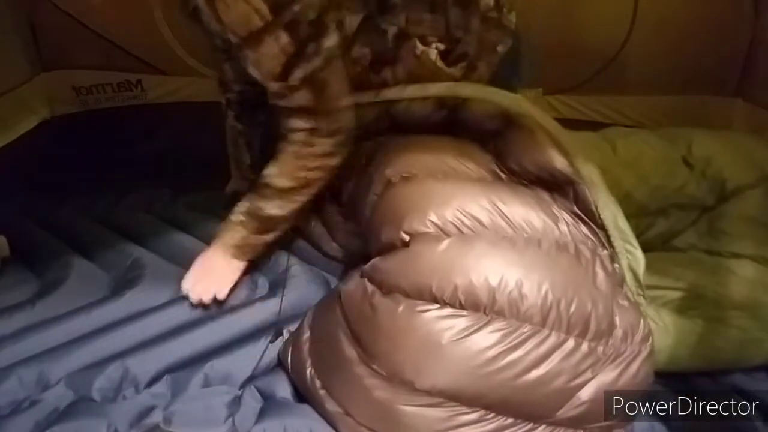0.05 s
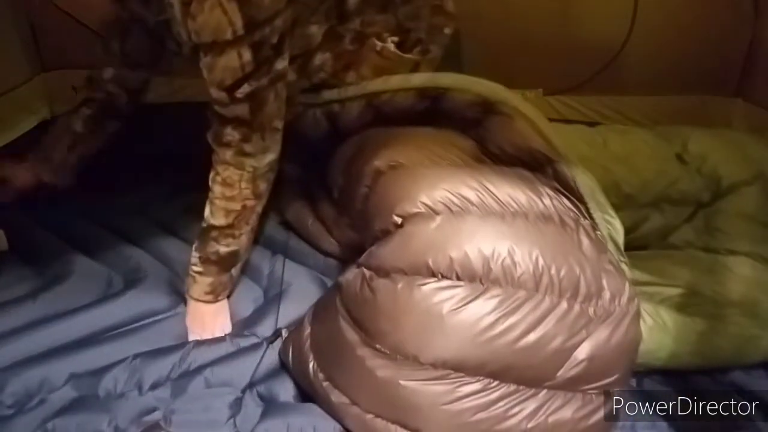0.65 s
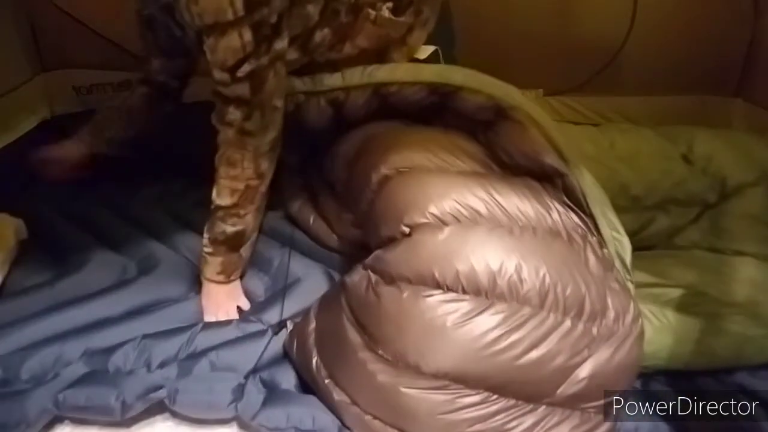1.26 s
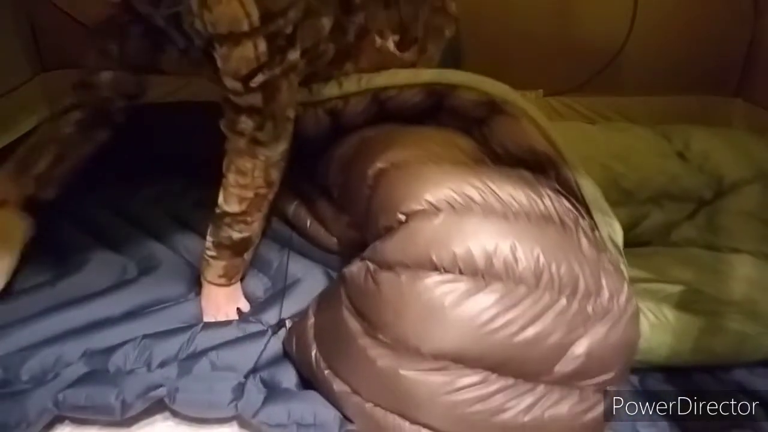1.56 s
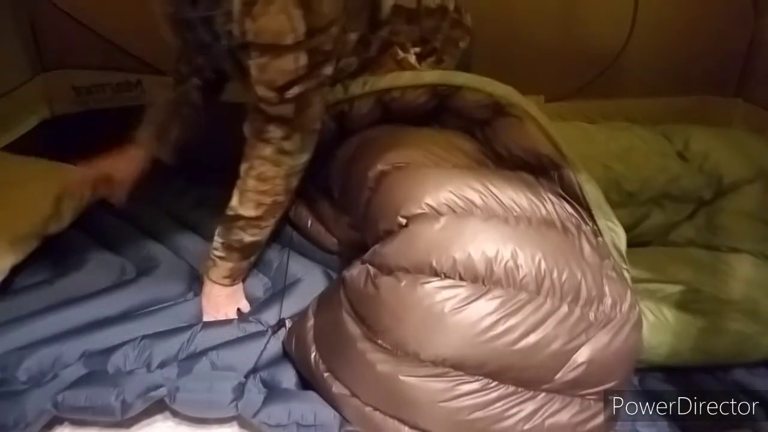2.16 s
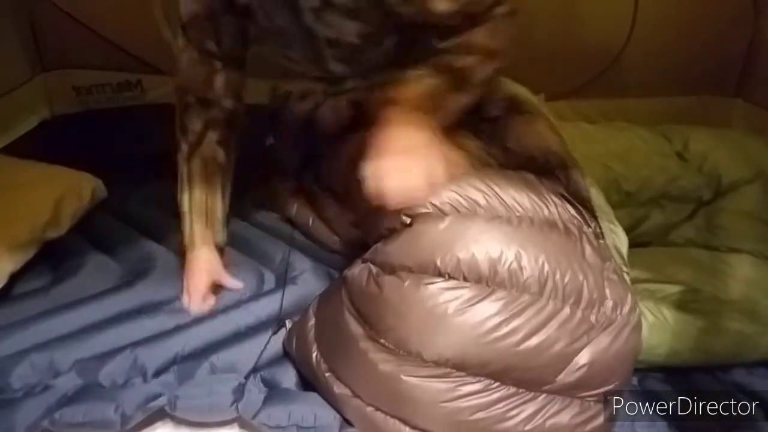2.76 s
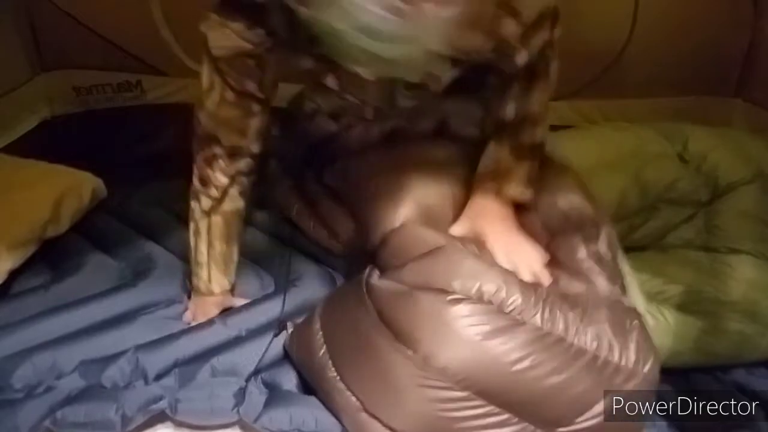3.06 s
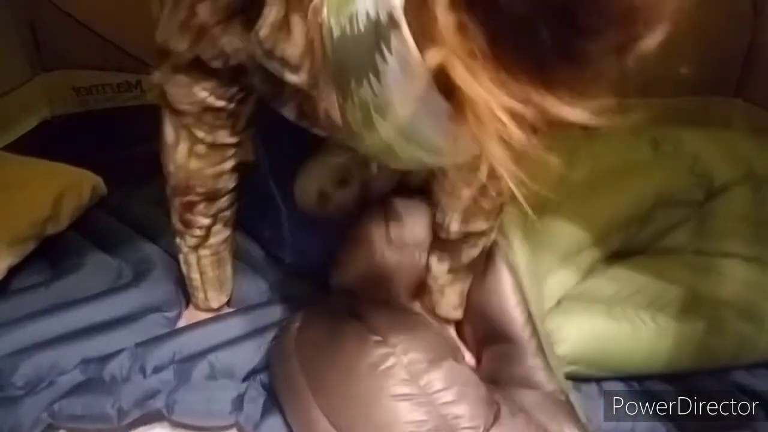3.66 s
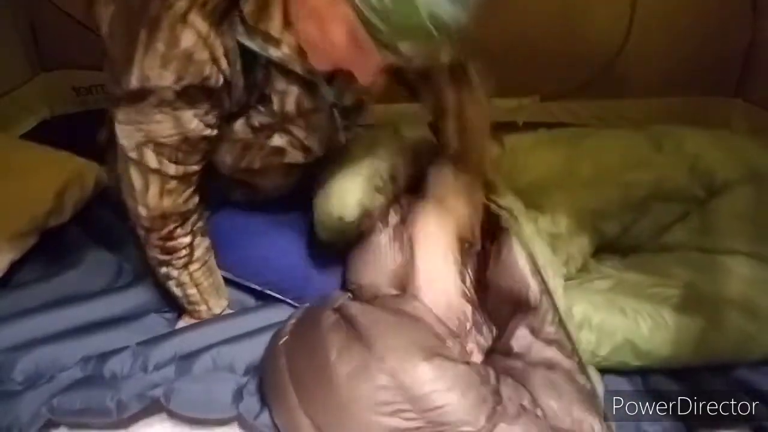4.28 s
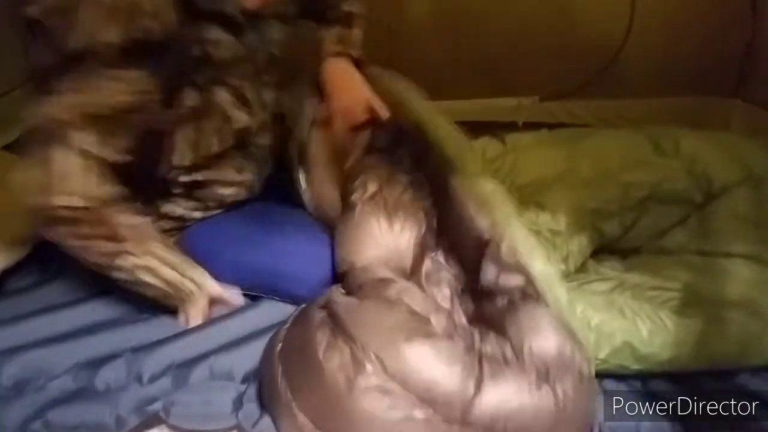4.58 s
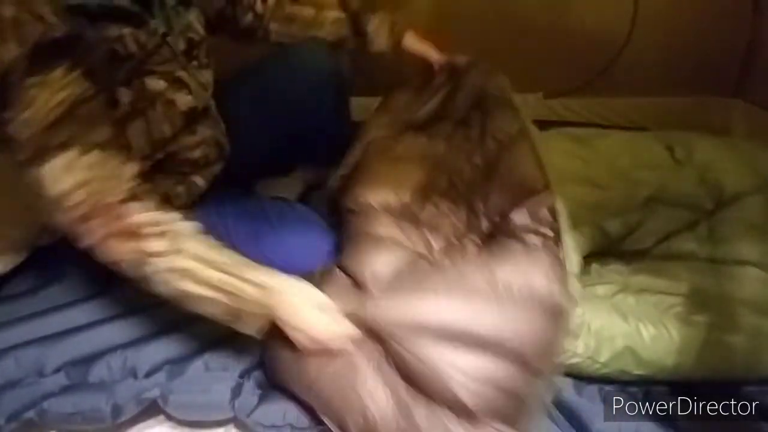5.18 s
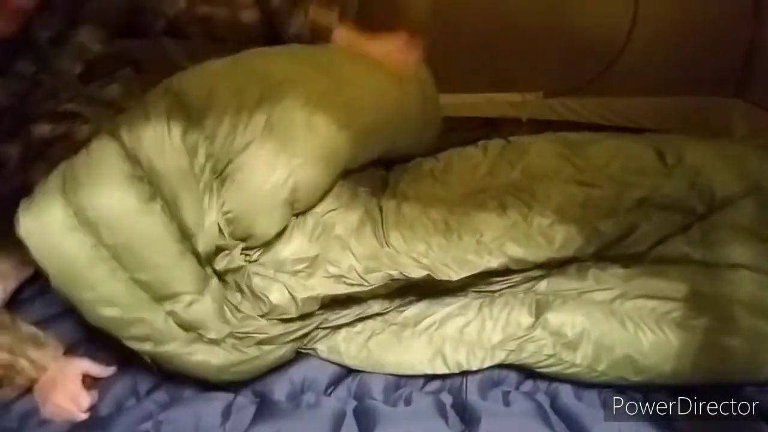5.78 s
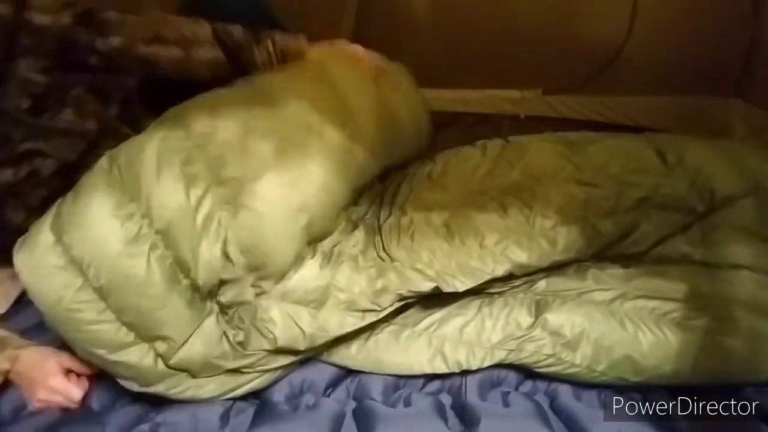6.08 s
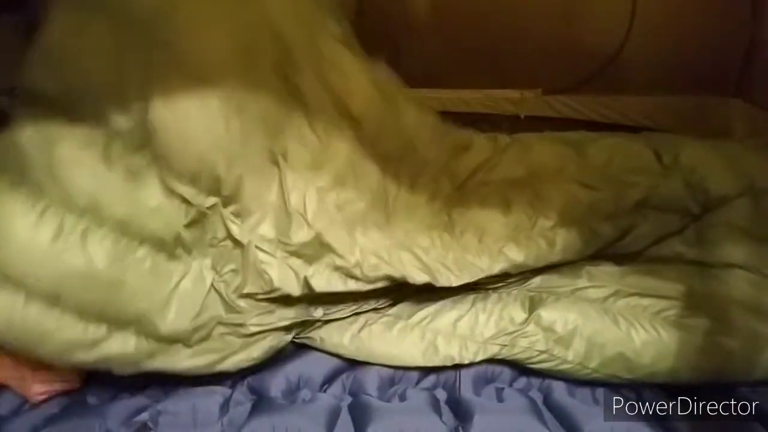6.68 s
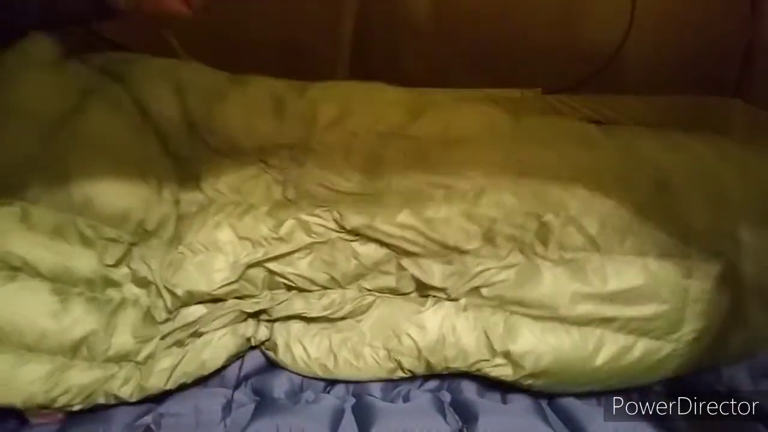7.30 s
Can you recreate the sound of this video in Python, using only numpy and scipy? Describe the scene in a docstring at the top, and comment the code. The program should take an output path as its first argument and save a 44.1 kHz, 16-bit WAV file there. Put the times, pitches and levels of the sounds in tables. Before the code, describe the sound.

Close, uneven rustling and sliding of down-filled nylon bedding, broken midway by a single hollow air pad thump.

```python
"""In a tent, someone crawls onto an air pad, pushes a down quilt aside and pulls another over, close by.
Thin nylon hisses as it slides, its wrinkles buckle in swarms and single snaps, and the down fill
shuffles softly. Hands and knees thump the pad, once hard enough to set its air chambers ringing.
The cloth walls give a weak echo, and a faint steady noise lies under it all."""
import sys
import numpy as np
from scipy import signal
from scipy.fft import rfft, irfft
from scipy.io import wavfile
from scipy.ndimage import uniform_filter1d

SR = 44100
rng = np.random.default_rng(int(sys.argv[2]) if len(sys.argv) > 2 else 0)


def bounce(signal):
    """Save signal as a 16-bit WAV file at the path given by the first command-line argument."""
    frames = np.transpose(np.atleast_2d(signal))
    limited = np.clip(frames, -1, 1)
    pcm = np.round(limited * 32767).astype(np.int16)
    wavfile.write(sys.argv[1], SR, pcm)


N = 323694
LAG_S = 0.0001244  # the bedding is nearer the right side, so the left hears it later

# tone of small buckling wrinkles: f/Hz, level/dB
CRUMPLE_TONE = [(40, 14), (300, -3), (700, -3.5), (1100, 1.5), (1900, -0.5), (2300, -1), (2700, -2),
                (3500, -4), (5000, -7.5), (8000, -6.5), (10000, -27), (16000, -8)]


def gain_of(db):
    """Turns decibels into a number to multiply a sound by."""
    return 10 ** (np.asarray(db) / 20)


def evened(x):
    """Scales a signal to an average size (rms) of 1."""
    return x / np.sqrt(np.mean(x ** 2) + 1e-20)


def peaked(x):
    """Scales a sound so that its outline peaks at 1."""
    return x / abs(signal.hilbert(x)).max()


def look_up(points, hz):
    """Reads between the rows of a table, on a log frequency scale."""
    f, value = np.transpose(points)
    return np.interp(np.log(hz + 1), np.log(f + 1), value)


def add(mix, s, sound):
    """Mixes a sound in, starting at s seconds."""
    part = mix[max(round(s * SR), 0):][:len(sound)]
    part += sound[:len(part)]


def coloured(x, tone, size=4096):
    """Gives a sound the tone in a table, with a filter that keeps sudden starts sharp."""
    log_gain = np.log(gain_of(look_up(tone, abs(np.fft.fftfreq(size, 1 / SR)))))
    taps = np.fft.ifft(np.exp(np.conj(signal.hilbert(log_gain)))).real[:size // 2]
    return signal.oaconvolve(x, taps.reshape((1,) * (x.ndim - 1) + (-1,)))[..., :x.shape[-1]]


def stereo(x, lag_s):
    """Makes two channels, the left lag_s behind the right."""
    lag = int(round(lag_s * SR))
    return np.array([np.roll(x, lag // 2), np.roll(x, lag // 2 - lag)])


def wander(rate_hz):
    """A smooth random curve that moves mostly slower than rate_hz."""
    hz = np.fft.rfftfreq(N, 1 / SR)
    return evened(irfft(rfft(rng.standard_normal(N)) / (1 + (hz / rate_hz) ** 2), N))


def hiss(tone, patchy_db, size=512):
    """Stereo noise with louder patches that come and go across time and pitch."""
    # how alike left and right are: f/Hz, likeness (0 to 1)
    likeness = [(60, 0.98), (290, 0.74), (640, 0.35), (1400, 0.27), (3000, 0.28), (7000, 0.028),
                (15000, 0.082)]
    frames, hz = N // (size // 4) + 5, np.fft.rfftfreq(size, 1 / SR)
    a, b, c, d, patches = rng.standard_normal((5, frames, len(hz))).transpose(0, 2, 1)
    patches = evened(uniform_filter1d(uniform_filter1d(patches, size=11, axis=0), size=12, axis=1))
    same = np.clip(look_up(likeness, hz), 0, 1)[:, None]
    right, unrelated = a + 1j * b, c + 1j * d
    delay = np.exp(-2j * np.pi * hz * LAG_S)[:, None]
    left = (same * right + np.sqrt(1 - same ** 2) * unrelated) * delay
    spectra = np.array([left, right]) * gain_of(patchy_db * patches)
    noise = signal.istft(spectra, nperseg=size, noverlap=size - size // 4)[1][:, :N]
    return evened(coloured(noise, tone))


def background(level_db=-56.5):
    """A faint, steady, low rush."""
    # tone of the rush: f/Hz, level/dB
    rush_tone = [(20, -12), (40, -10), (70, 4.5), (130, -1), (230, 3), (350, -12), (600, -9.5), (1200, -21),
                 (3000, -24.5), (9500, -28), (15000, -24)]
    return gain_of(level_db) * hiss(rush_tone, patchy_db=1.5)


def tent_echo(x, size=8192):
    """Sound bounces off the cloth walls and dies quickly."""
    # how long the echo lasts: f/Hz, time to fade by 60 dB/s
    fade_times = [(100, 0.13), (400, 0.043), (1500, 0.21), (5000, 0.096), (15000, 0.011)]
    bounces = rng.standard_normal((2, size)) * (rng.random((2, size)) < .1)
    bounces *= np.arange(size) > SR * .002  # none in the first 2 ms
    hz, t, spectra = signal.stft(bounces, SR, nperseg=128)
    fade = gain_of(-60 * t / look_up(fade_times, hz)[:, None])
    tail = signal.istft(spectra * fade, SR, nperseg=128)[1]
    return signal.oaconvolve(x, tail / np.linalg.norm(tail, axis=1, keepdims=True), axes=1)[:, :N]


def pad_thumps(level_db=-2, ring_db=1, pulse_speed=0.89, low_hz=48):
    """Each blow pushes one pulse of air out of the pad, whose chambers ring on."""
    # hands and knees landing: t/s, relative level/dB, rough pitch f/Hz
    blows = [(0.2985, -34, 130), (0.7686, -44, 110), (1.048, -33, 120), (1.216, -37.5, 135),
             (2.253, -32.5, 208), (2.3207, -41, 250), (2.5033, -33.5, 220), (4.1692, -3.5, 192),
             (4.6541, -45, 292), (5.002, -30.5, 158), (5.0856, -26, 198), (5.3847, -36, 180),
             (5.453, -33, 98), (7.1775, -28.5, 240), (7.22, -26, 200)]
    # ringing air chambers and two brief knocks of the skin: f/Hz, level/dB, time to fade by 60 dB/s
    pad_notes = [(108, -35, .25), (152, -23, .25), (188, -20, .27), (238, -23, .24), (295, -20.5, .26),
                 (371, -25, .22), (440, -16, .03), (660, -18, .035), (678, -36, .16)]
    out, lead_s = np.zeros(N), .02
    t = np.arange(SR // 2) / SR - lead_s
    age = np.maximum(t, 0)
    ring = sum(gain_of(db - 60 * age / fade_s) * np.sin(2 * np.pi * hz * age)
               for hz, db, fade_s in pad_notes)
    for s, db, hz in blows:
        phase = 2 * np.pi * hz * t * pulse_speed
        push = phase / (1 + phase ** 2 / 4) ** 3
        # trim the lowest bass so the push is a tight thump
        push = signal.sosfiltfilt(signal.butter(2, hz * .38, "high", fs=SR, output="sos"), push)
        add(out, s - lead_s, gain_of(db + level_db) * (push / push.max() + gain_of(ring_db) * ring))
    # deep bass is cut from the thumps
    return stereo(signal.sosfiltfilt(signal.butter(2, low_hz, "high", fs=SR, output="sos"), out), 0)


def movement(layer, drag_db):
    """Loudness of one layer over time: each stroke swells and fades on top of the steady dragging."""
    # pushes and pulls: peak t/s, rise/s, fall/s, then level/dB for slide, crumple and fill
    strokes = [(.02, .1, .1, -58.5, -70, -66), (.16, 0.044, .068, -48, -50, -47),
               (.275, 0.14, 0.13, -50.5, -46.5, -45.5), (.378, 0.052, .022, -48.5, -51, -53),
               (.442, 0.026, 0.12, -59, -54, -55.5), (.615, .06, 0.13, -57, -74, -65),
               (.78, 0.019, 0.37, -47, -49.5, -55), (1.002, 0.098, 0.17, -36.5, -39, -39),
               (1.18, 0.071, 0.077, -42, -49, -46.5), (1.215, 0.028, 0.083, -44, -41, -46),
               (1.343, .15, .13, -47.5, -69, -53.5), (1.495, 0.056, .17, -44.5, -48.5, -43.5),
               (1.67, .06, 0.093, -45.5, -74, -51), (1.782, 0.031, 0.094, -48.5, -64, -52),
               (1.93, .07, 0.053, -55, -54, -53.5), (2.034, 0.037, 0.18, -54, -78, -64),
               (2.222, 0.056, 0.16, -51, -49, -51.5), (2.478, 0.11, 0.097, -51.5, -44.5, -44),
               (2.773, 0.084, 0.32, -56, -58, -55), (2.915, 0.11, 0.074, -52, -49.5, -48.5),
               (3.211, .25, 0.068, -48, -44.5, -49), (4.105, 0.41, 1, -50.5, -47, -43.5),
               (4.356, 0.055, .12, -43.5, -59, -55), (4.52, 0.11, 0.092, -40.5, -33, -32),
               (4.605, .06, 0.086, -35.5, -35, -32), (4.843, 0.049, 0.059, -42, -52, -62),
               (5.069, .14, 0.07, -38.5, -45, -45), (5.374, 0.088, 0.075, -51, -47.5, -41),
               (5.518, 0.077, 0.13, -45.5, -52.5, -44), (5.749, 0.14, 0.12, -45, -42.5, -42.5),
               (6.29, 0.57, 0.2, -67, -52, -45), (6.54, 0.055, .13, -53.5, -50, -45),
               (7.03, 0.14, .21, -45, -67, -54), (7.34, 0.05, .11, -44, -52, -44.5)]
    # the quilts dragged over the pad, one after the other: t/s, level/dB
    dragging = [(2.9, -75), (3.25, -48.5), (3.6, -44.5), (4.2, -48), (4.75, -48.5), (5.3, -49.5),
                (5.42, -57.5), (5.65, -55), (5.95, -50), (6.2, -47.5), (6.5, -48.5), (6.73, -57.5),
                (7.0, -47), (7.34, -50.5)]
    edge_db, curve = -11.5, 1.74  # drop one rise or fall away from the peak; 1 = pointed, 2 = rounded
    column = ("slide", "crumple", "fill").index(layer)
    t = np.arange(0, N, 32) / SR
    power = gain_of(np.interp(t, *np.transpose(dragging), left=-np.inf) + drag_db) ** 2
    for s, rise, fall, *layer_db in strokes:
        away = np.maximum((s - t) / rise, (t - s) / fall)
        power += gain_of(layer_db[column] + edge_db * away ** curve) ** 2
    return np.interp(np.arange(N) / SR, t, np.sqrt(power))


def buckle(hz, damping, size=700):
    """A wrinkle flips over: one swing of the cloth that dies almost at once."""
    phase = 2 * np.pi * hz * np.arange(size) / SR
    swing = np.exp((-damping + 1j * np.sqrt(1 - damping ** 2)) * phase).imag
    return np.diff(swing, prepend=0) / phase[1]


def swarm(per_s, spread_db, low_hz, high_hz, damping, scatter_s, count=14):
    """Wrinkles of many sizes flip at random, each size at its own place on the bedding."""
    out = np.zeros((2, N))
    for k, hz in enumerate(np.geomspace(low_hz, high_hz, count)):
        flips = rng.random(N) < per_s / count / SR
        strength = gain_of(spread_db * np.minimum(rng.exponential(1, N), 3.5))
        clicks = flips * strength * rng.choice([-1., 1.], N)
        wrinkles = signal.oaconvolve(clicks, evened(buckle(hz, damping)))[:N]
        place = np.cos(k * np.pi * (3 - np.sqrt(5)))  # this step never lands on the same place twice
        out += stereo(wrinkles, LAG_S + scatter_s * place)
    return out


def down_shuffle(level_db=-1.5):
    """Broad folds flop over, muffled by the down."""
    # tone of the down fill: f/Hz, level/dB
    fill_tone = [(20, -27), (45, -25), (70, -4.5), (110, -5.5), (160, 0), (250, -0.5), (430, 3.5),
                 (600, 0.5), (900, 0.5), (1500, -51.5), (4000, -63)]
    folds = swarm(per_s=1300, spread_db=2.5, low_hz=73, high_hz=1000, damping=.54, scatter_s=.000092)
    return gain_of(level_db) * movement("fill", drag_db=-2) * evened(coloured(folds, fill_tone))


def wrinkle_ticks(level_db=-10):
    """Now and then a middle-sized wrinkle ticks out of the crumpling."""
    ticks = swarm(per_s=45, spread_db=2, low_hz=600, high_hz=2400, damping=.55, scatter_s=.0001)
    return gain_of(level_db) * movement("crumple", drag_db=-1) * evened(coloured(ticks, CRUMPLE_TONE))


def crumpling(level_db=-2.5, clump_db=1.5):
    """Small wrinkles buckle in clumps as the quilt's cover folds."""
    wrinkles = swarm(per_s=2200, spread_db=3.6, low_hz=570, high_hz=3700, damping=.5, scatter_s=.00016)
    loudness = gain_of(level_db + clump_db * wander(rate_hz=25)) * movement("crumple", drag_db=-2.5)
    return loudness * evened(coloured(wrinkles, CRUMPLE_TONE))


def wrinkle_snaps(pop_boost_db=1, crack_boost_db=6.5, crack_s=.0007, loose_db=-24, loose_s=.007):
    """A large wrinkle gives a hollow pop and a thin crack, and shakes a few small ones loose."""
    # large wrinkles snapping: t/s, pop level/dB, pop f/Hz, crack level/dB (levels before the boosts)
    snaps = [(.1129, -35, 760, -58), (.1472, -29, 500, -52), (.1862, -25, 1320, -38),
             (.2464, -25, 2000, -25), (.2657, -29, 980, -39), (.3131, -25, 1220, -48),
             (.3349, -25, 1400, -33), (.4412, -36, 1840, -42), (.4932, -37, 1390, -51),
             (.7656, -35, 1520, -52), (.9899, -24, 600, -42), (1.1162, -25, 1210, -43),
             (1.1941, -24, 730, -39), (1.215, -15, 1170, -27), (1.2251, -23, 1030, -49),
             (1.5636, -28, 490, -54), (1.6935, -33, 1160, -46), (1.8118, -35, 1380, -52),
             (2.2509, -28, 600, -52), (2.2695, -30, 1130, -43), (2.3216, -26, 510, -52),
             (2.337, -33, 1200, -52), (2.4225, -29, 850, -49), (2.4473, -26, 690, -42),
             (2.4591, -24, 920, -38), (2.4633, -21, 1080, -41), (2.4816, -27, 1200, -35),
             (2.4974, -26, 690, -39), (2.6468, -38, 430, -73), (2.7419, -35, 1250, -61),
             (2.7707, -21, 780, -43), (2.8205, -21, 1050, -39), (2.9022, -29, 1230, -39),
             (2.9195, -29, 1980, -39), (4.1693, -17, 650, -40), (4.2621, -22, 800, -54),
             (4.4902, -11, 1100, -20), (4.5732, -11, 1760, -15), (4.6005, -12, 2000, -15),
             (4.609, -11, 1300, -20), (4.6537, -16, 480, -30), (4.9971, -17, 1070, -31),
             (5.0716, -21, 1730, -30), (5.0843, -21, 490, -47), (5.2983, -25, 380, -62),
             (5.578, -31, 1080, -37), (5.7131, -30, 1340, -30), (5.8617, -31, 1150, -58),
             (5.9005, -29, 930, -46), (6.0027, -29, 860, -39), (6.3462, -26, 1000, -46),
             (6.3568, -29, 980, -47), (6.4985, -29, 360, -62)]
    # tone of the pop: f/Hz, level/dB
    pop_tone = [(30, -8), (80, 6), (150, 9.5), (900, 2), (1500, 1.5), (2000, 4), (2700, -6), (3500, -5),
                (5000, -12), (16000, -40)]
    # tone of the crack: f/Hz, level/dB
    crack_tone = [(500, -22), (2000, -4), (2700, -2), (3400, 3.5), (4100, 4), (5200, -1.5), (6500, -6.5),
                  (7800, -11), (9500, -19), (15000, -19)]
    out, lead_s = np.zeros((2, N)), .0003
    t = np.arange(2048) / SR
    loose = gain_of(loose_db) * np.exp(-t / loose_s)
    for s, pop_db, hz, crack_db in snaps:
        kick = loose * rng.standard_normal(len(t)) * (rng.random(len(t)) < .2)
        kick[0] = -1
        kick[int(SR / hz / 2)] += .3  # the fold springs back half a swing later
        swing = signal.oaconvolve(kick, buckle(hz, damping=.55))[:len(t)]
        pop = peaked(coloured(swing, pop_tone))
        burst = rng.standard_normal(len(t)) * (np.exp(-t / crack_s) + loose)
        crack = peaked(coloured(2 * kick + burst, crack_tone))
        snap = gain_of(pop_db + pop_boost_db) * pop + gain_of(crack_db + crack_boost_db) * crack
        add(out[0], s - lead_s + LAG_S * rng.uniform(.3, .75), snap)
        add(out[1], s - lead_s, snap)
    return out


def thread_zips(spread=0.033):
    """Threads drum over threads: a narrow hiss at the rate they cross, broader for a short stroke."""
    # quick strokes across the weave: middle t/s, half length/s, thread crossing f/Hz, level/dB
    zips = [(.625, 0.12, 7700, -66), (.78, 0.0055, 4300, -36), (1.525, 0.034, 3670, -46.5),
            (1.662, 0.055, 3800, -48.5), (1.67, 0.072, 8050, -48), (2.329, 0.009, 6600, -46.5),
            (5.464, 0.033, 6000, -47), (5.516, 0.038, 6470, -46.5)]
    out = np.zeros((2, N))
    for s, half_s, hz, db in zips:
        count = int(2 * half_s * SR)
        off_pitch = np.fft.rfftfreq(count, 1 / SR) / hz - 1
        band = 1 / (1 + half_s * (off_pitch / spread) ** 2)
        for channel in out:
            drumming = evened(irfft(rfft(rng.standard_normal(count)) * band, count))
            add(channel, s - half_s, gain_of(db) * drumming * np.hanning(count) ** 2)
    return out


def nylon_slide(level_db=1, catch_db=1.5):
    """Nylon hisses as it slides on nylon, catching and letting go."""
    # tone of the sliding: f/Hz, level/dB
    slide_tone = [(40, -4), (500, -2.5), (1500, 2.5), (3000, 5), (3800, 3), (5000, 2.5), (6500, 1.5),
                  (8200, 2), (9300, -4), (10300, -1.5), (11500, 1.5), (13500, 1.5), (15500, 2)]
    loudness = gain_of(level_db + catch_db * wander(rate_hz=11)) * movement("slide", drag_db=0)
    return loudness * hiss(slide_tone, patchy_db=1)


def scene(echo_db=-13, left_db=1.12, slide_left_db=0.72):
    """Bedding and pad in the tent, a little louder on the left, over a faint background."""
    cloth = crumpling() + wrinkle_ticks() + down_shuffle() + wrinkle_snaps()
    bed = cloth + gain_of(echo_db) * tent_echo(cloth) + pad_thumps()
    bed *= gain_of([[left_db], [-left_db]])
    nylon = (nylon_slide() + thread_zips()) * gain_of([[slide_left_db], [-slide_left_db]])
    return background() + bed + nylon


def record(dry, ceiling=.92, top_hz=15800):
    """A soft limiter keeps the hardest blow below full scale; then the highest treble is cut away."""
    rounded = dry / (1 + (dry / ceiling) ** 6) ** (1 / 6)
    treble_cut = signal.firwin(511, top_hz, window=("kaiser", 9), fs=SR)
    return signal.oaconvolve(rounded, treble_cut[None], "same")


dry = scene()
out = record(dry)
bounce(out)
```